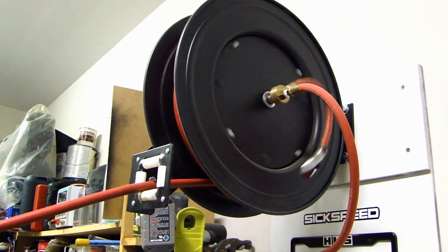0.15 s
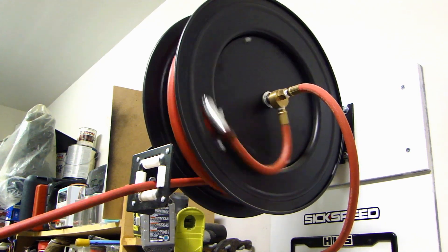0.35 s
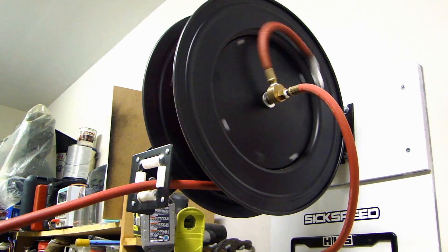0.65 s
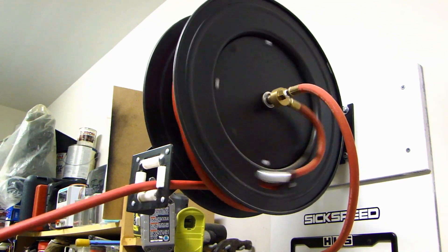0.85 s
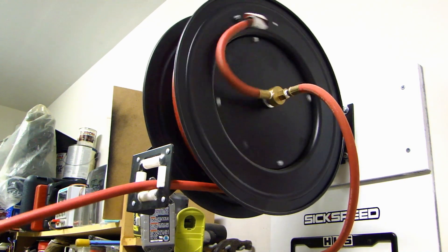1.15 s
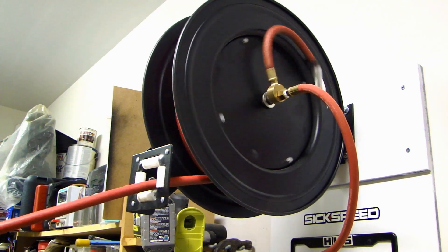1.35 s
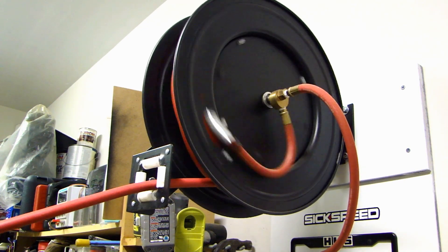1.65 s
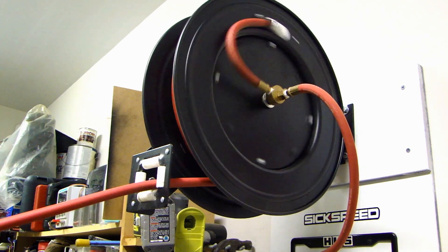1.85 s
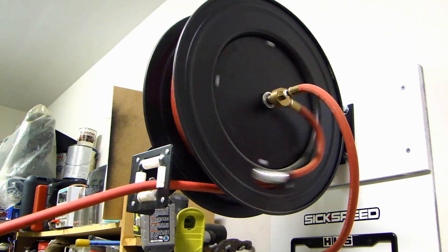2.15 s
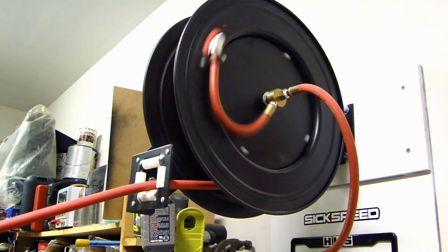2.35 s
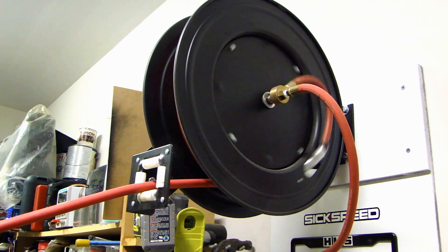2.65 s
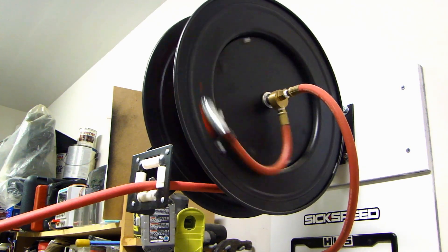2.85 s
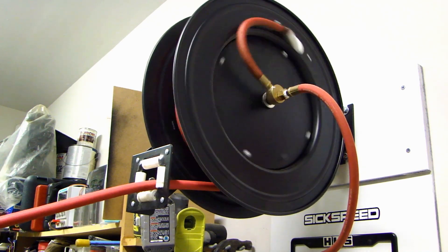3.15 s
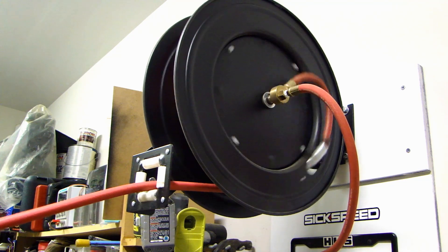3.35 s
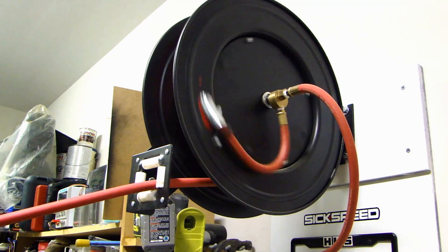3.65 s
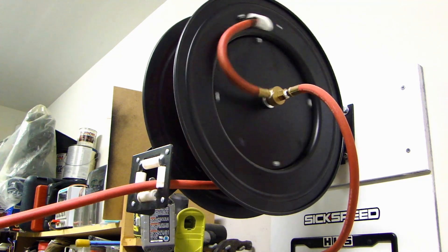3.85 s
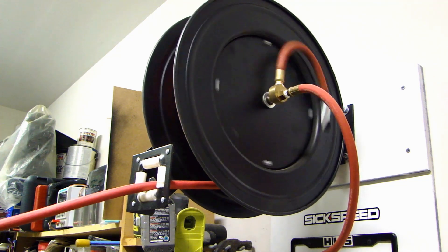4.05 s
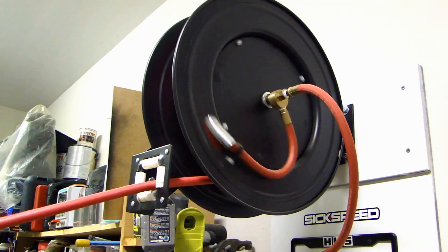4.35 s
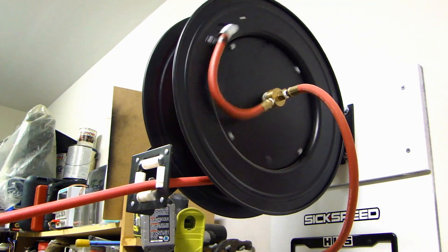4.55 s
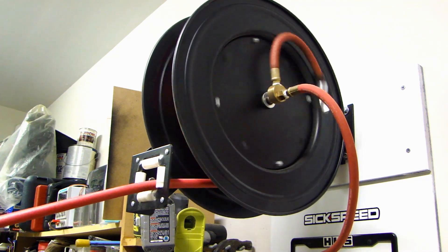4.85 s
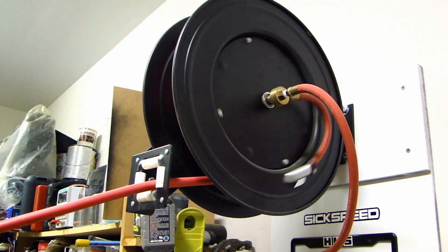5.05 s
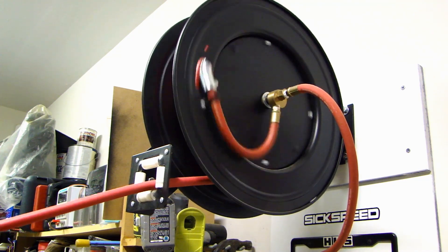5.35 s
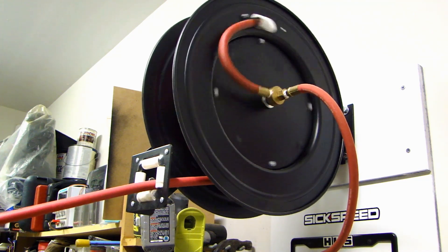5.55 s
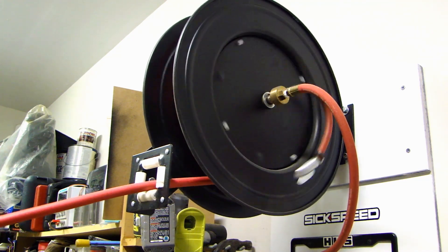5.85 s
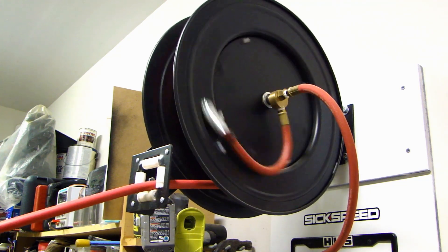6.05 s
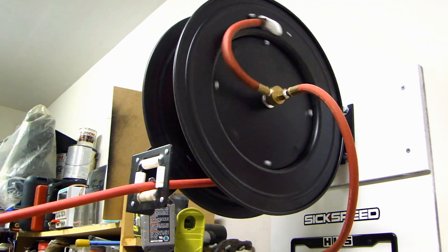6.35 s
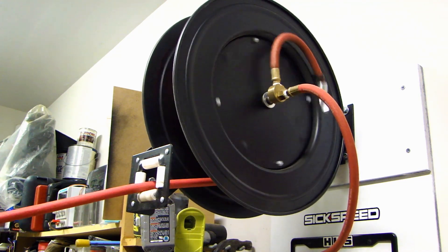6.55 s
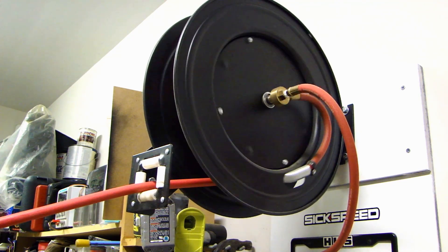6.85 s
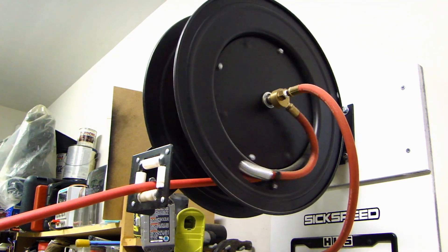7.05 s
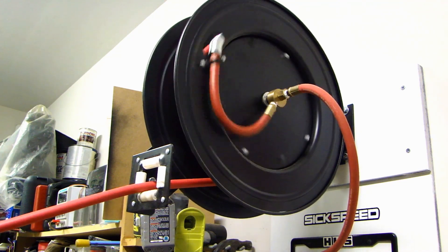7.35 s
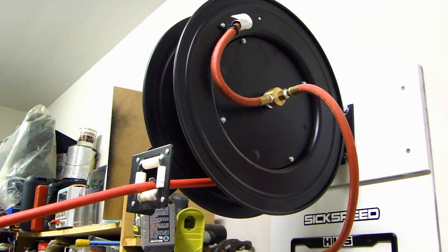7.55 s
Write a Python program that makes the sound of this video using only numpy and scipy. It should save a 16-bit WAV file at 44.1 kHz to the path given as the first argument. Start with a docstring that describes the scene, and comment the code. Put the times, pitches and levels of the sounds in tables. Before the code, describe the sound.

Close stereo pickup of a steel air-hose reel in a hard-walled garage. A sprung pawl gives a light knock, then four quick bright metallic clacks, around three groups per second, each with a low bracket thump. Between them the rubber hose rubs and scrapes, with small ticks and thin squeaks. The groups grow further apart and their clicks looser toward the end. Short bright room reverberation.

```python
"""In a hard-walled garage, a close pair of microphones hears an air hose pulled off a steel retractable reel.
The hose rubs through its guide rollers: trains of tiny noise puffs, swelling once each half turn.
Twice a turn the sprung pawl knocks onto the ratchet, then a row of four teeth flicks it: noise bursts
ring the drum's resonances and thump the bracket. The reel ticks, squeaks and knocks lightly, once or in runs.
Decaying noise tails answer from the room, and a faint low hum, noise in a narrow band, lies under it all."""
import sys
import numpy as np
from scipy import signal
from scipy.fft import rfft, irfft
from scipy.io import wavfile

SR = 44100
rng = np.random.default_rng(int(sys.argv[2]) if len(sys.argv) > 2 else 0)


def unload_audio(sound):
    """Save the sound as a 16-bit wav file, at the path given as the first command line argument."""
    columns = np.transpose(np.atleast_2d(sound))
    # keep every value between -1 and 1, then stretch to whole-number steps
    steps = np.round(np.clip(columns, -1, 1) * 32767)
    wavfile.write(sys.argv[1], SR, steps.astype(np.int16))


N = 340011  # length in samples
EDGE_HZ = 10520  # upper band limit of the microphones
TICK_GAP_S = .0305  # nominal gap between the ticks of a run

# The hose sliding out. Each row: time in seconds, relative rubbing level in dB, relative fine scraping level in dB.
HOSE_PULL = [(0.0, -32.5, -29.5), (0.77, -30.5, -33), (1.11, -34, -30), (1.37, -39, -37.5),
             (1.59, -38.5, -31), (1.72, -33, -27.5), (2.17, -35, -33), (2.66, -34.5, -27.5),
             (3.04, -31.5, -33.5), (3.19, -39.5, -40), (3.88, -39.5, -40.5), (4.05, -34.5, -33),
             (4.18, -34, -32), (4.37, -43.5, -43), (5.02, -45, -37.5), (5.1, -42, -40), (5.36, -47, -39),
             (5.83, -36.5, -38.5), (6.07, -35, -30.5), (6.26, -35.5, -31.5), (6.5, -42.5, -35.5),
             (6.93, -36.5, -35), (7.08, -43.5, -40), (7.36, -42.5, -39), (7.59, -32.5, -40),
             (7.7, -34, -40)]

# Each row of teeth passing the pawl, one per half turn. Each row: first drop in seconds, first gap in seconds,
# change of each next gap in seconds, relative level in dB, relative thump level in dB,
# lead of the knock before the first drop in seconds, relative knock level in dB.
TOOTH_ROWS = [(.2011, 0.026, 0.001, .5, -1.5, .065, 1), (.5455, .0301, -0.00064, -2, -1.5, 0.07, 4.5),
              (.842, .014, 0.0018, .5, -3.5, .063, -6), (1.1406, 0.026, -.001, -2.5, 1, .05, -3),
              (1.5464, 0.025, -0.002, 1.5, 4, .063, -3), (1.8405, .0255, -.004, -1.5, -4, .047, -1),
              (2.146, 0.022, -0.0026, 1, 1.5, 0.023, 4.5), (2.4285, 0.028, -0.0021, -1.5, -3, 0.052, -6),
              (2.7067, 0.025, 0.0033, 1, 3, .05, -2), (3.0345, 0.025, 0.0022, .5, 1, .014, 2),
              (3.411, 0.026, 0.0035, 1.5, 3, 0.054, 0), (3.832, 0.028, 0, -1.5, -4, 0.059, -0.5),
              (4.1884, .0225, -0.0024, 1, 1, 0.058, 1), (4.585, .0298, .0029, -1, -1, .075, -5),
              (5.0285, 0.031, .0036, 2, 4, 0.067, -2.5), (5.486, 0.036, .0004, .5, -0.5, 0.083, -1),
              (5.868, 0.036, -0.00086, 2, 3.5, 0.063, 2), (6.2344, .025, 0.012, 1, -3, 0.051, 3.5),
              (6.74, 0.045, 0.0096, 2, -4, .045, 0), (7.4237, 0.036, 0.016, 0, -8, .083, -1)]
# The four teeth of every row, in order. Each row: bright snap, dull clank and low thump, all in relative dB.
TEETH = [(-0.93, -12, -58.5), (-2.8, -14, -53), (-2.5, -14.5, -44.5), (-2, -13, -41)]

# Short ticks, squeaks and light knocks of the reel, single or in runs. Each row: first in seconds,
# last in seconds, relative level in dB, share of thin squeak from 0 to 1.
REEL_TICKS = [(.9778, 1.1542, -16, 0.22), (1.3109, 1.376, -17, 0.82), (1.464, 1.464, -23, 1),
              (1.686, 1.761, -17, 0.96), (1.951, 1.951, -16, 1), (2.3055, 2.334, -15, 0.07),
              (2.5667, 2.6745, -15, .15), (2.882, 2.9163, -16, 0.26), (4.088, 4.1582, -15.5, .05),
              (4.3307, 4.3311, -17.5, .63), (4.5294, 4.5294, -25.5, .95), (4.98, 4.98, -22, 0.7),
              (6.122, 6.122, -17, 0.1), (6.4647, 6.4647, -22.5, 0), (6.5794, 6.5794, -20, 0),
              (6.695, 6.695, -20.5, 0.2), (7.027, 7.027, -21, .56), (7.1351, 7.1355, -19, 0.48),
              (7.232, 7.232, -22, 0.23)]

# Resonances of the steel drum and pawl, of the hub and guide under light contact, and of the mounting bracket.
# Each row: frequency in Hz, width in Hz, height above the smooth spectrum in dB.
DRUM_MODES = [(750, 40, 5), (911, 30, 9), (1384, 22, 11), (1430, 18, 9), (1469, 18, 9), (1541, 14, 14.5),
              (1582, 26, 12), (1720, 50, 4), (2220, 50, 3), (3480, 45, 4), (3683, 22, 7), (3800, 70, 3),
              (4154, 14, 5), (4281, 45, 5), (4632, 16, 5), (4724, 20, 9), (4774, 20, 9), (4855, 35, 7),
              (5064, 14, 8), (5476, 14, 5), (5518, 22, 5), (6140, 25, 6), (6300, 40, 4), (6405, 50, 9.5),
              (6798, 18, 8), (7450, 60, 3), (7820, 100, 2.5)]
HUB_MODES = [(1570, 40, 11), (1720, 45, 8), (2240, 60, 6), (3720, 90, 9), (4300, 140, 7), (4850, 90, 7),
             (5040, 40, 12), (6180, 120, 4), (6750, 150, 4), (7480, 60, 6), (7850, 150, 3)]
BRACKET_MODES = [(105, 12, 2.5), (161, 15, 6), (213, 40, 9.5), (291, 14, 6.5)]

# Smooth spectra of the sounds. Each row: frequency in Hz, relative level in dB.
RUB_COLOUR = [(100, -77), (250, -39.5), (500, -9), (900, -0.5), (1500, 0.5), (2700, 0), (4500, -3.5),
              (5600, -3.5), (10500, 1)]
KNOCK_COLOUR = [(100, -59.5), (350, -26), (800, -8.5), (1500, -3.5), (3000, -1.5), (5500, -5), (10500, 0)]
CLACK_COLOUR = [(100, -37.5), (350, -36), (600, -7.5), (1000, -3), (1300, -1.5), (1850, -0.5), (2300, 0),
                (3500, -2), (4800, -2), (5800, -3), (6600, -1.5), (7300, -4), (8500, -8.5), (10500, -4.5)]
THUMP_COLOUR = [(20, -2.5), (100, -2), (210, -9), (330, -4.5), (600, -10.5), (2000, -57)]
TICK_COLOUR = [(100, -79), (700, -22), (1500, -7.5), (3500, -7.5), (5400, -3.5), (6300, 1), (8000, 2.5),
               (9500, 4.5), (10500, -7)]
SQUEAK_COLOUR = [(100, -92), (5000, -28.5), (8800, -16.5), (9650, 15.5), (10100, 7.5), (10600, 6.5)]

# Decay of the garage. Each row: frequency in Hz, time to fall by 60 dB in seconds.
GARAGE_DECAY = [(200, 0.067), (660, 0.49), (1700, 0.49), (4600, .48), (10000, 0.26)]
# Likeness of the two microphones. Each row: frequency in Hz, left-right correlation from 0 to 1.
MIC_LIKENESS = [(200, 0), (600, 0.69), (1500, 0.86), (3000, 0.48), (5500, 0.31), (9000, 0.14)]
# Balance of the two microphones. Each row: frequency in Hz, left minus right in dB.
MIC_BALANCE = [(200, 3), (700, -2.5), (1500, -1.1), (5000, -1.7), (9000, -1)]


def gain_of(db):
    """Decibels to an amplitude factor."""
    return 10 ** (np.asarray(db) / 20)


def unit(x):
    """Scales a sound to energy 1 a channel."""
    return x / np.sqrt(np.sum(x ** 2, -1, keepdims=True) + 1e-20)


def read(points, hz):
    """Reads a table on a log-frequency axis."""
    f, value = np.transpose(points)
    return np.interp(np.log(hz + 1), np.log(f + 1), value)


def add(mix, s, sound):
    """Lays a sound into the stereo mix at time s in seconds."""
    start = max(round(s * SR), 0)
    part = mix[:, start:][:, :sound.shape[-1]]
    part += sound[:, :part.shape[1]]


def through(x, response):
    """Passes both channels through an impulse response."""
    return signal.oaconvolve(x, np.atleast_2d(response), axes=1)[:, :x.shape[1]]


def colour(points, peaks=(), size=16384):
    """A minimum-phase filter of energy 1 below the band edge: a smooth spectrum plus ringing resonances."""
    hz = abs(np.fft.fftfreq(size, 1 / SR))
    lift = sum((gain_of(db) ** 2 - 1) / (1 + (2 * (hz - f) / width) ** 2) for f, width, db in peaks)
    gain = gain_of(read(points, hz)) * np.sqrt(np.maximum(1 + lift, .5))
    in_band_energy = np.mean(gain ** 2 * (hz < EDGE_HZ))
    log_gain = np.log(gain / np.sqrt(in_band_energy))
    # the Hilbert transform of the log gain gives the phase
    return np.fft.ifft(np.exp(np.conj(signal.hilbert(log_gain)))).real


def pair(x):
    """Two unrelated signals become what two close microphones hear: most alike in the middle band."""
    a, b = rfft(x)
    same = read(MIC_LIKENESS, np.fft.rfftfreq(x.shape[1], 1 / SR))
    return irfft([a, same * a + np.sqrt(1 - same ** 2) * b], x.shape[1])


def burst(t60, rise_s=0.00028, size=4096):
    """A crowd of short-lived modes set off at once: decaying noise of energy 1, cut off after size samples."""
    t = np.arange(size) / SR
    noise = pair(rng.standard_normal((2, size)))
    return unit(noise * gain_of(-60 * t / t60) * (1 - np.exp(-t / rise_s)))


def half_turns():
    """How far the drum has turned at each sample: one half turn from each row of teeth to the next."""
    starts = np.transpose(TOOTH_ROWS)[0]
    before, after = 2 * starts[0] - starts[1], 2 * starts[-1] - starts[-2]
    starts = np.r_[before, starts, after]
    return np.interp(np.arange(N) / SR, starts, np.arange(len(starts)))


def puffs(size, t60):
    """Each slip in a train lets off noise that dies quickly; overall rms about 1."""
    # power falls 60 dB in t60
    power = signal.lfilter([1], [1, -gain_of(-120 / (t60 * SR))], size ** 2)
    return np.sqrt(power / power.mean()) * pair(rng.standard_normal((2, N)))


def friction(per_s, spread_db, t60):
    """Many tiny slips at random times and of uneven size, each a short puff."""
    size = gain_of(spread_db * np.minimum(rng.exponential(1, N), 4))
    return puffs(size * (rng.random(N) < per_s / SR), t60)


def drag(level_db, swing_db, peak_at):
    """Friction follows the pull, and swells once in each half turn, at the share peak_at of it."""
    pull_db = np.interp(np.arange(N) / SR, np.transpose(HOSE_PULL)[0], level_db)
    return gain_of(pull_db + swing_db * np.cos(2 * np.pi * (half_turns() - peak_at)))


def chatter(spread_db=3.5, t60=0.058, count=11):
    """Slips at even steps of the drum's angle, count to a half turn, so that their rate follows its speed."""
    steps = np.diff(np.floor(count * half_turns()), append=0) > 0
    return puffs(steps * gain_of(spread_db * np.clip(rng.standard_normal(N), -2, 2)), t60)


def hose(rub_db=-1.5, scrape_db=-6.5, squeak_db=-6, rattle_db=-8):
    """The hose drags over drum and rollers, while the turning parts scrape finely, chatter and rattle."""
    _, rubbing, scraping = np.transpose(HOSE_PULL)
    rub = drag(rubbing, swing_db=2.5, peak_at=0.2) * friction(per_s=200, spread_db=6.0, t60=0.034)
    scrape = drag(scraping, swing_db=2.5, peak_at=0.24) * friction(per_s=440, spread_db=5.5, t60=.02)
    slips = drag(scraping, swing_db=2.0, peak_at=0.2) * chatter()
    rub_and_rattle = through(gain_of(rub_db) * rub + gain_of(rattle_db) * slips, colour(RUB_COLOUR, HUB_MODES))
    fine_scrape = gain_of(scrape_db) * through(scrape, colour(TICK_COLOUR, HUB_MODES))
    squeak = gain_of(squeak_db) * through(slips, colour(SQUEAK_COLOUR))
    return rub_and_rattle + fine_scrape + squeak


def hum(hz=303, width_hz=22, level_db=-78):
    """A faint low hum, made as noise in a narrow band."""
    band = np.exp(-((np.fft.rfftfreq(N, 1 / SR) - hz) / width_hz) ** 2)
    noise = pair(rng.standard_normal((2, N)))
    return gain_of(level_db) * np.sqrt(N) * unit(irfft(rfft(noise) * band, N))  # sqrt(N) gives rms 1


def knocks(level_db=-2.5, t60=0.059, ride_db=-39, climb_db=5):
    """Before each row the loose pawl knocks onto the ratchet, then scrapes up the first tooth, ever louder."""
    blows, ride = np.zeros((2, 2, N))
    for s, *_, lead, db in TOOTH_ROWS:
        add(blows, s - lead, gain_of(level_db + db) * burst(t60))
        climb = np.linspace(0, climb_db, round(lead * SR))
        add(ride, s - lead, gain_of(ride_db + db + climb)[None])
    scrape = ride * friction(per_s=300, spread_db=5.5, t60=.025)
    return through(blows + scrape, colour(KNOCK_COLOUR, HUB_MODES))


def drops():
    """The pawl drops off each tooth, at widening or narrowing gaps: (s, snap dB, clank dB, thump dB)."""
    found = []
    for s, gap, growth, db, thump_db, *_ in TOOTH_ROWS:
        for k, (snap, clank, thump) in enumerate(TEETH):
            time = s + k * gap + growth * k * (k - 1) / 2
            found.append((time, db + snap, db + clank, thump_db + thump))
    return found


def pawl(snap_db=14, clank_db=17, strike_db=-7, strike_t60=0.0034, crack_t60=0.063,
         body_db=-4, body_t60=0.24, clank_t60=0.056, rebound_db=-8, rebound_s=.0024,
         alike=0.17, split_hz=2400):
    """Each drop is a hard strike, a crack partly the same every time, a rebound, and a slower drum clank."""
    snaps, clanks = np.zeros((2, 2, N))
    own = burst(crack_t60)  # the part every crack shares
    for s, bright, dull, _ in drops():
        crack = np.sqrt(alike) * own + np.sqrt(1 - alike) * burst(crack_t60)
        crack += gain_of(body_db) * burst(body_t60)
        crack += gain_of(strike_db) * burst(strike_t60)[0]  # reaches both microphones alike
        add(crack, rebound_s * rng.uniform(0.91, 1.2), gain_of(rebound_db) * burst(t60=0.013))
        add(snaps, s, gain_of(bright + snap_db) * unit(crack))
        add(clanks, s, gain_of(dull + clank_db) * burst(clank_t60, rise_s=0.0013))
    high = signal.butter(4, split_hz, "high", fs=SR, output="sos")
    low = signal.butter(4, split_hz, "low", fs=SR, output="sos")
    blows = signal.sosfilt(high, snaps) + signal.sosfilt(low, clanks)
    return through(blows, colour(CLACK_COLOUR, DRUM_MODES))


def thumps(level_db=26, t60=0.086):
    """The falling pawl also jolts the bracket, ringing its low resonances."""
    jolts = np.zeros((2, N))
    for s, _, _, db in drops():
        add(jolts, s, gain_of(db + level_db) * burst(t60, rise_s=0.0025))
    return through(jolts, colour(THUMP_COLOUR, BRACKET_MODES))


def reel_ticks(level_db=21, t60=0.058):
    """Short bright ticks and light knocks of the reel, single or in runs, some with a thin squeak."""
    ticks, squeaks = np.zeros((2, 2, N))
    for first, last, db, squeak in REEL_TICKS:
        count = 1 + round(abs(last - first) / TICK_GAP_S)
        for s in np.linspace(first, last, count):
            tick = gain_of(db + level_db) * burst(t60)
            add(ticks, s, np.sqrt(1 - squeak) * tick)
            add(squeaks, s, np.sqrt(squeak) * tick)
    return through(ticks, colour(TICK_COLOUR, HUB_MODES)) + through(squeaks, colour(SQUEAK_COLOUR))


def room_tail(build_s=0.0057):
    """Dense reflections off the near wall and ceiling, each band dying at its own speed."""
    hz, t, z = signal.stft(pair(rng.standard_normal((2, SR))), SR, nperseg=256)
    decay = gain_of(-60 * t / read(GARAGE_DECAY, hz)[:, None])
    tail = signal.istft(z * decay, SR, nperseg=256)[1]
    s = np.arange(tail.shape[1]) / SR
    return unit(tail * (1 - np.exp(-(s / build_s) ** 2)))


def garage(x, wet_db=-1, count=5, cycles_per_s=1.4):
    """The room's answer crossfades steadily between several decaying noise tails."""
    place = count * cycles_per_s * np.arange(N) / SR
    wet = np.zeros((2, N))
    for k in range(count):
        distance = np.minimum(abs((place - k) % count - 1), 1)  # 0 when this tail answers alone
        wet += through(x * np.cos(np.pi / 2 * distance), room_tail())
    return x + gain_of(wet_db) * wet


def scene():
    """The reel and hose with the room's answer; thumps and hum come without it."""
    reel = hose() + knocks() + pawl() + reel_ticks()
    return garage(reel) + thumps() + hum()


def record(dry):
    """The microphones differ in level by band; the band is limited and the tallest peaks are rounded off."""
    tilt_db = read(MIC_BALANCE, np.fft.rfftfreq(N, 1 / SR))
    heard = irfft(rfft(dry) * gain_of([tilt_db / 2, -tilt_db / 2]), N)
    edge = signal.firwin(1023, EDGE_HZ, window=("kaiser", 8), fs=SR)[None]
    heard = signal.oaconvolve(heard, edge, "same")
    heard = heard / (1 + (heard / .85) ** 6) ** (1 / 6)
    return signal.oaconvolve(heard, edge, "same")  # the rounding adds treble above the edge


dry = scene()
out = record(dry)
unload_audio(out)
```